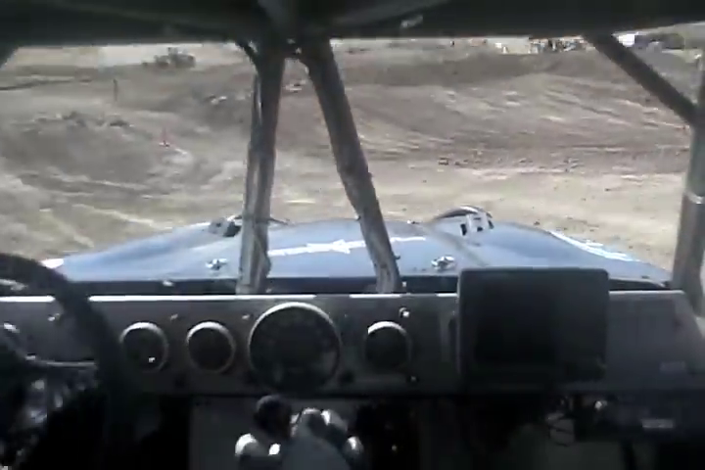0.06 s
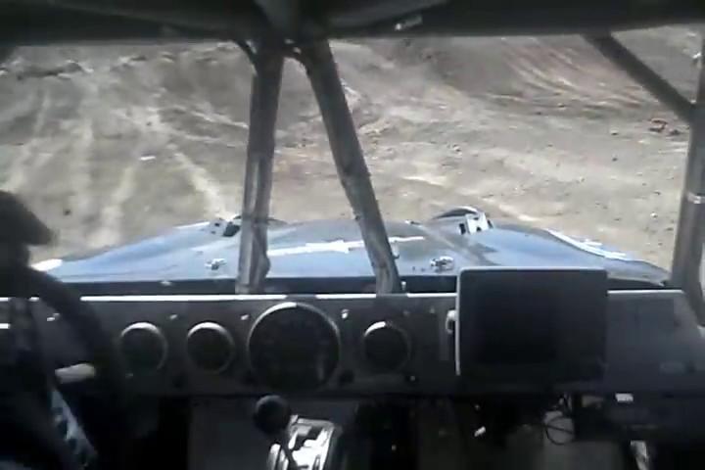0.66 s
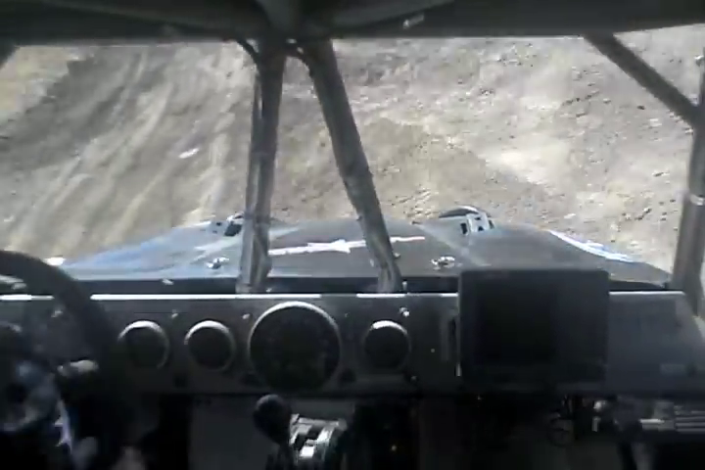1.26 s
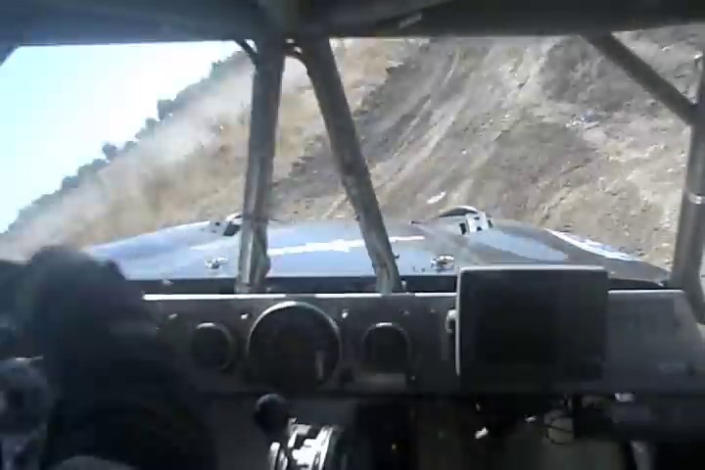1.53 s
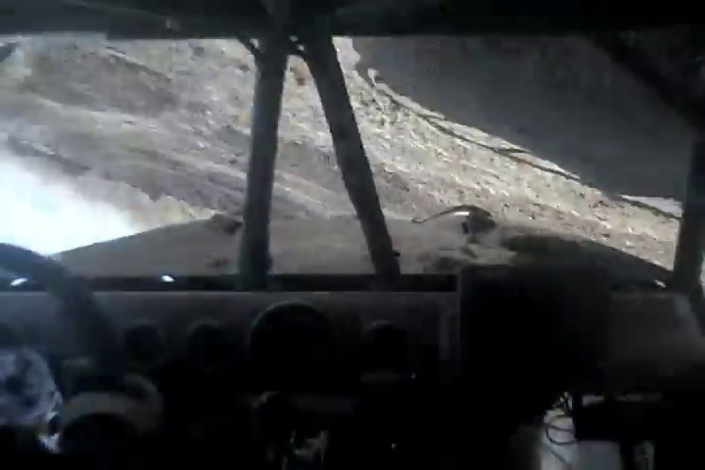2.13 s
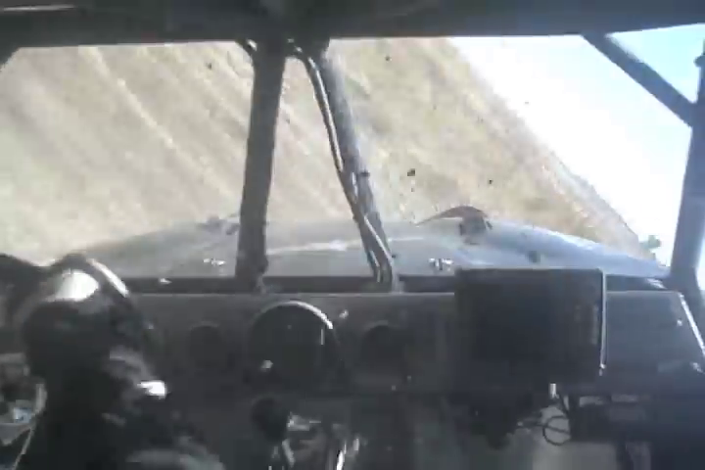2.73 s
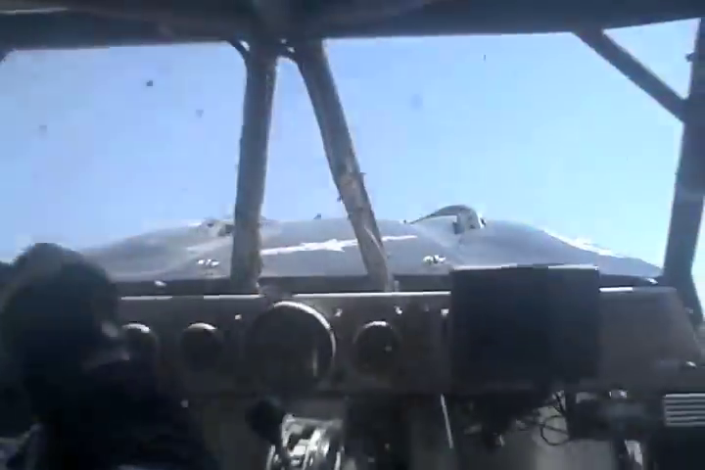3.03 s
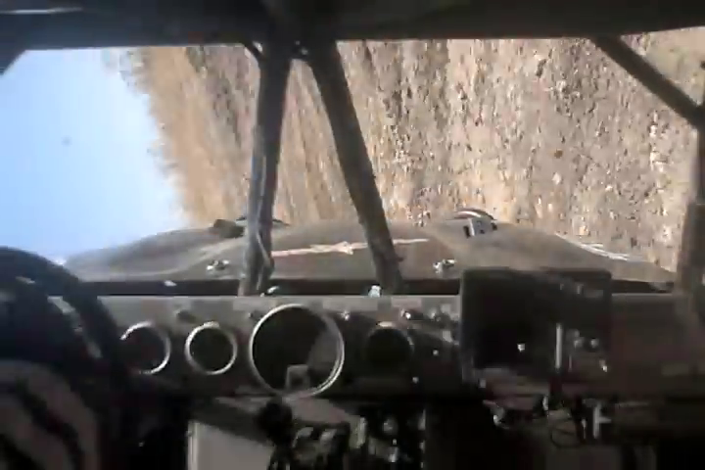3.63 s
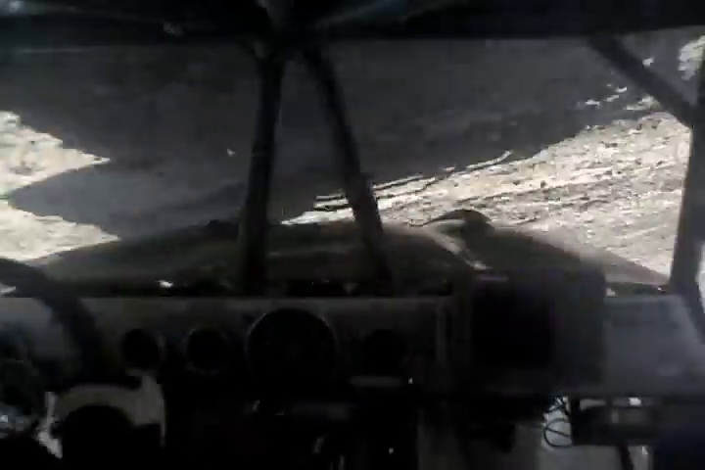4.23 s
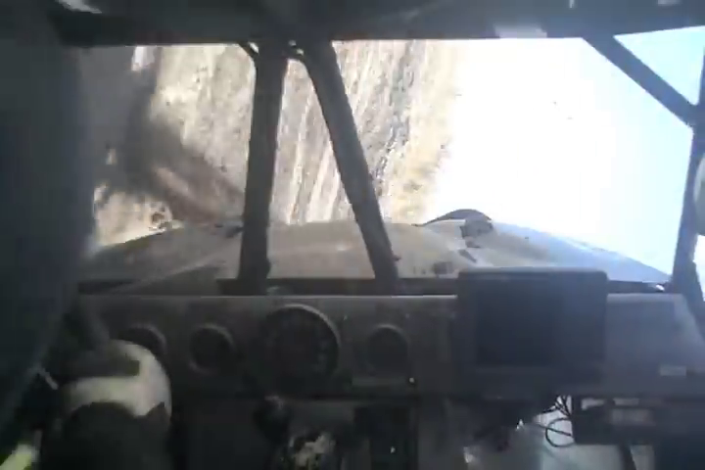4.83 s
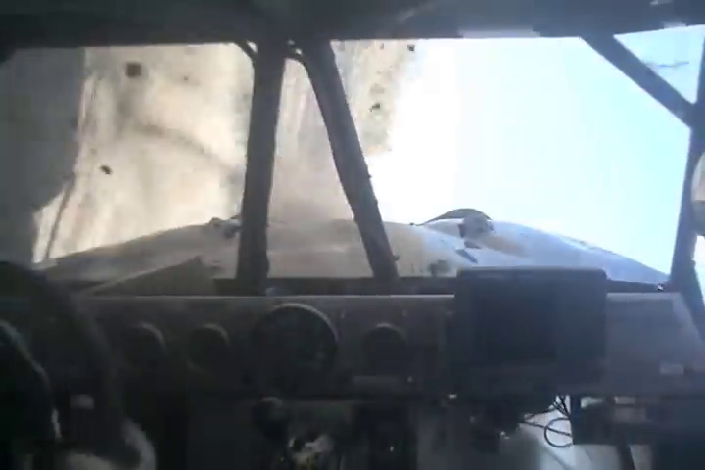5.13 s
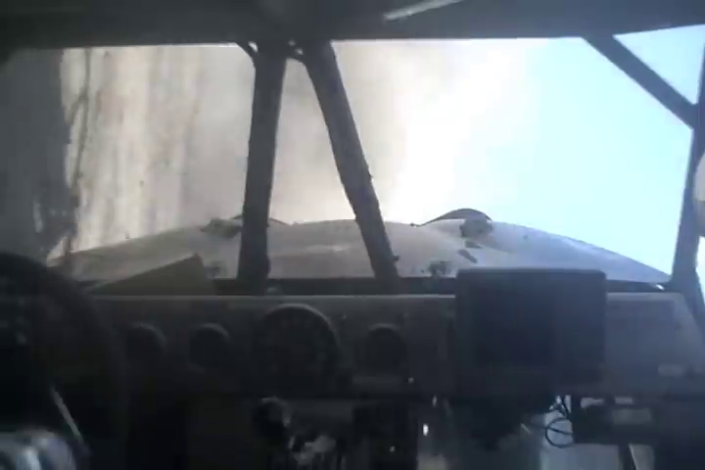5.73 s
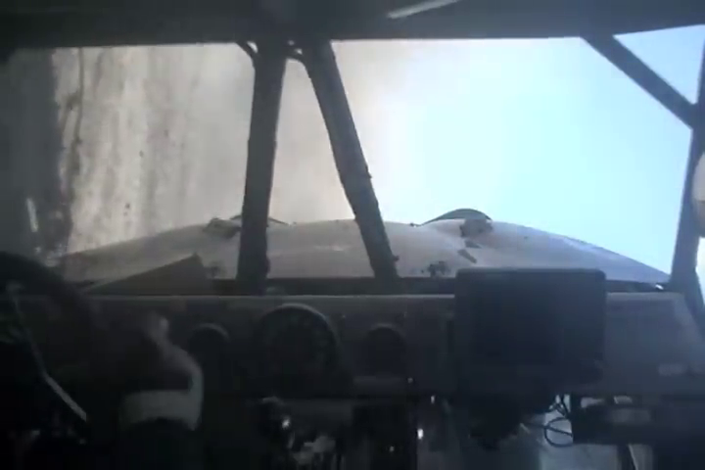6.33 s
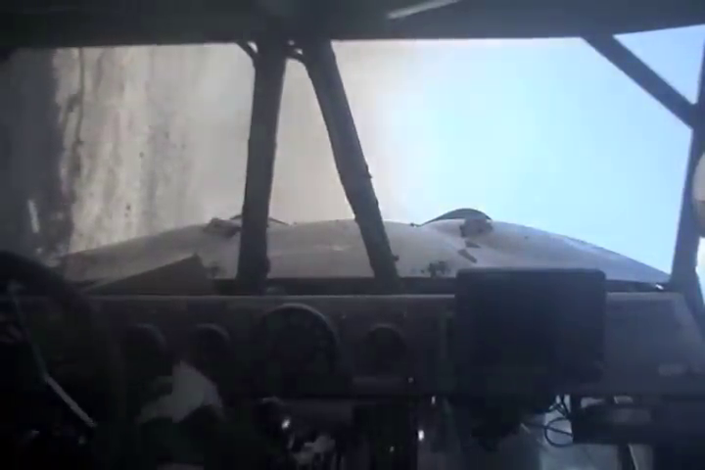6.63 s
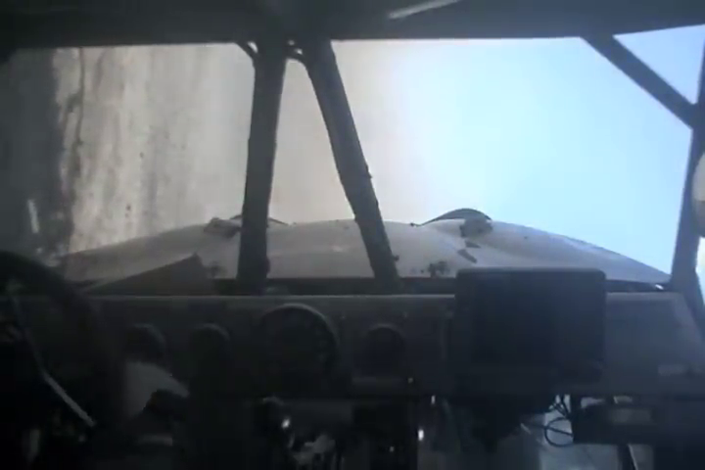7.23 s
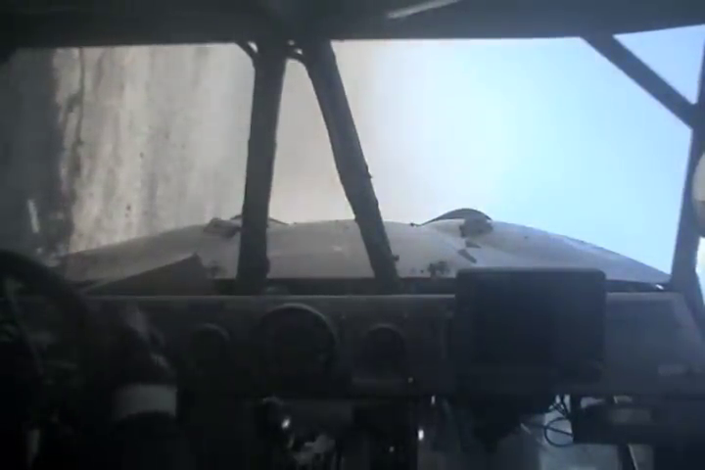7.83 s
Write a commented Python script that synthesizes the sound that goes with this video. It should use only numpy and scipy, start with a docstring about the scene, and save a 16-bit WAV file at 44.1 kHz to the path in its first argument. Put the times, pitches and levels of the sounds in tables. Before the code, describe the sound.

Inside the open cab of an off-road buggy, a V8 engine booms and barks while dirt hisses under the tyres and the frame squeaks. The revs drop, then surge and fall as the vehicle rolls over. Metal panels slam down, loose parts clack, the cage scrapes briefly on rock and stones pelt the body, the loudest moments overloading the microphone. After a last slam the buggy slides to rest and the engine idles.

```python
"""Inside the open cab of a V8 off-road buggy that rolls over on a dirt track.
First the engine booms and barks, soil hisses under the tyres and the joints squeak. Near 2 s the revs drop,
then rise and fall as the wheels leave the ground. Stones pelt the body, loose parts clack, panels slam down
and the cage scrapes on rock; the loudest moments overload the microphone. After a last slam near 5 s
the buggy slides to rest on its side, idling."""
import sys
import numpy as np
from scipy import signal
from scipy.fft import rfft, irfft, next_fast_len
from scipy.io import wavfile
from scipy.ndimage import uniform_filter1d, map_coordinates

SR = 44100
rng = np.random.default_rng(int(sys.argv[2]) if len(sys.argv) > 2 else 0)


def inscribe(sig):
    """Save sig as 16-bit PCM at rate SR to the path in sys.argv[1].

    A 1-D sig is mono; a 2-D sig holds one channel per row.
    Samples are clipped to [-1, 1] before scaling.
    """
    pcm = np.round(np.clip(np.atleast_2d(sig).T, -1, 1) * 32767)
    wavfile.write(sys.argv[1], SR, pcm.astype(np.int16))


N = 347067


def amp(db):
    """Turn decibels into a gain."""
    return 10 ** (np.asarray(db) / 20)


def unit(x):
    """Scale to an average (rms) level of 1."""
    return x / np.sqrt(np.mean(x ** 2) + 1e-20)


def steady(x):
    """Hold the level near 1, averaged over 1/8 s."""
    return x / np.sqrt(np.abs(uniform_filter1d(x ** 2, size=SR // 8)) + 1e-12)


def curve(points):
    """Join (time, value) points into one value per sample."""
    return np.interp(np.arange(N) / SR, *np.transpose(points))


def wobble(rate):
    """A smooth curve through `rate` random values a second."""
    fine = np.arange(0, N * rate / SR + 1, 1 / 8)
    smooth = map_coordinates(rng.standard_normal(int(fine[-1]) + 4), [fine])
    return np.interp(np.arange(N) * rate / SR, fine, smooth)


def filtered(x, response):
    """Scale each frequency in x by response(hz)."""
    m = next_fast_len(len(x) + SR // 4)
    return irfft(rfft(x, m) * response(np.fft.rfftfreq(m, 1 / SR)), m)[:len(x)]


def coloured(x, tone):
    """Shape x with a tone table of (frequency, level) points."""
    f, db = np.transpose(tone)
    return filtered(x, lambda hz: amp(np.interp(np.log(hz + 1), np.log(f), db)))


def noise(tone, size=N):
    """Noise with the given tone, at level 1."""
    return unit(coloured(rng.standard_normal(size), tone))


def noise_band(centre_hz, width_hz, size=N):
    """Noise around one pitch, at level 1."""
    return unit(filtered(rng.standard_normal(size), lambda hz: np.exp(-((hz - centre_hz) / width_hz) ** 2)))


def puffs(pulses, life_s):
    """Turn each pulse into a dying puff of noise."""
    return signal.lfilter([1], [1, -np.exp(-1 / (life_s * SR))], pulses) * rng.standard_normal(N)


def add(track, s, x):
    """Mix x into the track at s seconds."""
    start = max(round(s * SR), 0)
    track[start:start + len(x)] += x[:N - start]


# The engine's notes, as multiples of its speed: (harmonic [number])
HARMONICS = [1, 2, 4, 6, 7, 8, 9, 10, 11, 12, 13, 14, 15, 16, 17, 18, 19, 20, 21, 22, 23]
# Strength of each of those notes: (revving [dB], idling [dB])
HARMONIC_LEVELS = [(-17, -26.5), (-4, -40.5), (-8, -20), (-14, -15.5), (0.0, -15), (2.5, 5), (-6.5, -32),
                   (-7.5, -30), (-4, -15.5), (-5, -34.5), (-9.5, -6.5), (-7, -37), (-16, -9.5), (-12.5, -5),
                   (-28, -39.5), (-27.5, -28.5), (-7.5, -10), (-6.5, -9), (-17.5, -10), (-14, -20.5),
                   (-15.5, -21)]
# Drones of the uneven cylinder banks: (harmonic [number], level at cruise on half throttle [dB],
# change per doubling of speed [dB], change from shut to open throttle [dB])
DRONES = [(3, -8, 15, -12), (4, -13, 12, -12), (5, .5, 10, 7), (11, -13, -2, 9), (16, -19, 0, 10)]
# Tones of the tailpipe and of the manifold, where the pipes join: (frequency [Hz], level [dB])
BOOM_TONE = [(15, -29), (45, 0.5), (110, 5), (170, 4.5), (205, -4.5), (270, -21), (400, -47.5), (800, -120)]
GROWL_TONE = [(120, -49.5), (190, -14.5), (250, -1), (330, -7.5), (460, -10), (900, -7.5), (1500, -46.5)]
CRUISE_HZ = 22.7  # engine cycles a second


def boom_and_growl(cycle, speed, throttle, load):
    """Two rows of cylinders fire unevenly; their notes boom in the tailpipe and growl in the manifold."""
    phases = rng.random(max(HARMONICS) + 1)

    def note(k, db):
        """Fuel burns unevenly, so each note wanders in strength."""
        return np.sqrt(2) * amp(db + 2.08 * wobble(25)) * np.cos(2 * np.pi * (k * cycle + phases[k]))

    drone = sum(note(round(k), db + rise_db * np.log2(speed / CRUISE_HZ) + open_db * (throttle - .5))
                for k, db, rise_db, open_db in DRONES)
    notes = unit(sum(note(k, load * revving + (1 - load) * idling)
                     for k, (revving, idling) in zip(HARMONICS, HARMONIC_LEVELS)))
    burble = amp(-12.5 + 4.6 * load) * noise([(20, -17), (60, -17), (200, -2), (400, -5.5), (1500, -57.5)])
    boom = steady(coloured(notes + burble, BOOM_TONE))
    growl = steady(coloured(notes + .5 * burble, GROWL_TONE))
    return steady(boom + drone), growl


# Sharp edge of each of the eight firings; one header (exhaust pipe) is closest: (strength [gain])
FIRING_SIZES = [2.44, 0.53, 1.1, 1.4, 1, 4.4, 0.25, 0.45]


def firings(cycle):
    """Eight pulses a cycle, each a little different in size and timing."""
    count = np.arange(int(cycle[-1] * 8))
    timing, scatter = rng.standard_normal((2048, 2))[:len(count)].T
    at = np.interp(count / 8, cycle, np.arange(N)) + .00006 * SR * timing
    size = np.take(FIRING_SIZES, count % 8) * amp(-.2 * scatter)
    return np.bincount(np.clip(at, 0, N - 1).astype(int), size, N)


# Tones of the firings, the rushing gas and the ringing header: (frequency [Hz], level [dB])
BARK_TONE = [(150, -39), (280, -10), (380, 8), (480, -10), (680, 4), (820, 1.5), (1250, 0), (2000, -12.5),
             (3000, -14.5), (4500, -41), (8000, -13), (9000, -29)]
RASP_TONE = [(500, -23), (850, 0.5), (1350, 0.5), (2200, -12.5), (3200, -14.5), (5000, -20.5)]
HOWL_TONE = [(330, -51), (480, -11.5), (545, 16), (610, 16.5), (680, -17.5), (900, -41.5)]


def bark_rasp_and_howl(cycle, load):
    """Firings bark in the headers and make them howl; gas rasps past the throttle."""
    pulses = firings(cycle)
    # each firing is a clean pulse low down and rough noise higher up
    edges = steady(pulses - uniform_filter1d(pulses, size=SR // 100))
    clean = load * filtered(edges, lambda hz: 1 / (1 + 1j * hz / 1200))
    gusts = load * steady(puffs(pulses, life_s=.007))
    wash = (1 - .26 * load) * rng.standard_normal(N)
    rough = filtered(gusts + wash, lambda hz: 1j * hz / (900 + 1j * hz))
    throb = load * np.cos(2 * np.pi * (cycle - 1 / 8))  # one swell a cycle
    bark = steady(coloured(amp(3 * throb) * (clean + .8 * rough), BARK_TONE))
    rasp = steady(coloured(amp(3 * throb) * rough, RASP_TONE))
    howl = steady(coloured(amp(10 * throb) * (clean + .55 * rough), HOWL_TONE))
    return bark, rasp, howl


# Panels shaken once a cycle: (pitch [Hz], width [Hz], base level [dB])
RATTLES = [(776, 17, -60), (1020, 39, -59.5), (1590, 50, -60.5)]
# Tone of the fan, belts and valves: (frequency [Hz], level [dB])
WHIRR_TONE = [(180, -33.5), (300, -3), (463, 1), (518, 2.5), (657, -5.5), (788, -3.5), (893, -7.5),
              (1030, -11.5), (1130, -14.5), (1960, -16), (2160, -14), (3990, -27.5), (8500, -27.5),
              (11000, -73), (18700, -120)]


def fittings(cycle, boom_db, bark_db):
    """The engine shakes the frame and panels; its moving parts whirr and a belt whines."""
    shudder = amp(boom_db - 29.5) * noise([(8, -1.5), (25, 14), (40, -4.5), (80, -22), (300, -99)])
    shake = amp(5 * np.cos(2 * np.pi * cycle) + .5 * (boom_db + 18.5))
    rattle = shake * sum(amp(db) * noise_band(hz, width) for hz, width, db in RATTLES)
    whirr = noise(WHIRR_TONE) * amp(-8 + .75 * bark_db + .28 * wobble(40))
    whine = amp(-51.5 + .41 * boom_db + 2.3 * wobble(11)) * noise_band(2170, width_hz=78)
    return shudder + rattle + whirr + whine


# How fast the engine runs; a cycle is two turns: (time [s], speed [cycles/s])
ENGINE_SPEED = [(0, 25.9), (.18, 27), (.55, 24.05), (.9, 24.8), (1.18, 21.8), (1.47, 26.5), (1.62, 23.2),
                (1.95, 10.5), (2.1, 8.8), (2.28, 12.3), (2.41, 27), (2.51, 30.2), (2.69, 28.6),
                (2.83, 21.4), (3.28, 16.6), (3.4, 11.8), (3.5, 16.2), (3.72, 19.6), (4, 21.95), (4.3, 30),
                (4.58, 40.8), (4.63, 33.4), (4.7, 31), (4.88, 16.5), (5.1, 12.4), (5.27, 19), (5.42, 21.8),
                (5.62, 23.05), (5.75, 22.6), (6.07, 10.7), (6.35, 7.3), (6.8, 8.4), (7.87, 8.05)]
# How far the throttle is open: (time [s], opening [0-1])
THROTTLE = [(0, 0.83), (.3, .98), (.46, 0.65), (.65, 0.71), (.88, 0.86), (1.33, 0.93), (1.52, 0.78),
            (1.62, 0.55), (2.7, 0.49), (2.85, 0.11), (3.2, 0.5), (3.6, 0.66), (4.1, 0.74), (4.4, 0.91),
            (4.58, 0.95), (4.6, 0.45), (4.92, 0.26), (5.4, .66), (5.75, 0.65), (5.87, 0), (7.87, 0.1)]
# How loud the engine's boom is heard, including the recorder's gain dipping and recovering:
# (time [s], level [dB])
HEARD_LEVEL = [(0.0, -11), (0.22, -12.5), (1.69, -13.5), (2.02, -23), (2.22, -15.5), (2.69, -13),
               (3.24, -22.5), (3.28, -27), (3.48, -20), (4.5, -12.5), (4.74, -16), (4.95, -25.5),
               (5.15, -16), (5.69, -14.5), (6.15, -22.5), (6.97, -22), (7.21, -12), (7.8, -12.5)]
HOWL_FROM_HZ, HOWL_SPAN_HZ = 25.23, 1.1  # the howl swells over this range of engine speed


def engine():
    """The V8: speed and throttle set the balance of its layers."""
    speed, throttle, boom_db = curve(ENGINE_SPEED), curve(THROTTLE), curve(HEARD_LEVEL)
    cycle = np.cumsum(speed * (1 + .003 * wobble(25))) / SR  # cycles run so far
    load = np.clip((speed - 9) / 7, 0, 1)  # 0 idling, 1 revving
    bark_db = boom_db - 26.5 + 24 * throttle
    rasp_db = bark_db - 13 - 23 * (1 - throttle)
    howling = throttle * np.clip((speed - HOWL_FROM_HZ) / HOWL_SPAN_HZ, 0, 1)
    howl_db = bark_db - 14 + howling * (11.5 + 9 * np.log2(speed / CRUISE_HZ))
    boom, growl = boom_and_growl(cycle, speed, throttle, load)
    bark, rasp, howl = bark_rasp_and_howl(cycle, load)
    exhaust = (amp(boom_db - .06) * boom + amp(bark_db - 3) * growl + amp(bark_db - 5.5) * bark
               + amp(rasp_db) * rasp + amp(howl_db) * howl)
    return exhaust + fittings(cycle, boom_db, bark_db)


# The tyres or body slide over soil: (start [s], length [s], level [dB])
SLIDES = [(0, .35, -34), (.35, 0.64, -35.5), (0.78, 0.734, -32.5), (1.546, 0.46, -34), (2.231, 0.46, -30),
          (3.09, 0.3, -33.5), (3.667, 0.32, -32.5), (4.33, 0.33, -35), (5, 1, -45)]
SLIDE_RISE_S, SLIDE_FALL_DB_PER_S = .027, 111
TRICKLE_DB, TRICKLE_FALL_DB_PER_S = -8, 13.5


def sliding():
    """Strength of the dirt sound: each slide rises, holds and falls, then thrown soil trickles down."""
    out, t = np.zeros(N), np.arange(N) / SR
    for s, length, db in SLIDES:
        rise = np.clip((t - s) / SLIDE_RISE_S, 0, 1)
        after = np.maximum(t - s - length, 0)
        fall_db = np.maximum(-SLIDE_FALL_DB_PER_S * after, TRICKLE_DB - TRICKLE_FALL_DB_PER_S * after)
        out = np.maximum(out, rise * amp(db + fall_db))
    return out


# Tones of the hissing soil and the jolting frame: (frequency [Hz], level [dB])
SOIL_TONE = [(530, -15), (900, 4), (1200, 5), (1550, 3), (1800, 3), (2970, -1.5), (3580, -3), (8500, -3.5),
             (11000, -59), (18700, -120)]
RUMBLE_TONE = [(10, -3.5), (28, -5.5), (55, 5.5), (90, -3.5), (200, -40.5)]


def dirt():
    """Clumps of soil and grains of grit hiss along the body; the frame rumbles over the ground."""
    grains = (rng.random(N) < 900 / SR) * rng.standard_normal(N)  # about 900 a second
    grains *= amp(.7 * np.minimum(rng.exponential(size=N), 4))
    grit = unit(coloured(puffs(np.abs(grains), life_s=.0026), SOIL_TONE))
    clumps = amp(4 * wobble(35))
    hiss = clumps * (amp(-.44) * noise(SOIL_TONE) + amp(-1) * grit)
    return sliding() * (hiss + amp(3) * noise(RUMBLE_TONE))


# Squeaks of the frame: (time [s], length [s], pitch [Hz], level [dB])
SQUEAKS = [(1.04, 0.098, 1880, -28.5), (1.1, 0.063, 4574, -30.5), (1.387, 0.069, 4200, -31.5),
           (1.73, 0.12, 3020, -33.5), (1.85, 0.11, 2290, -33), (2.45, 0.13, 3060, -31.5),
           (5.016, .06, 2960, -28)]


def squeaks():
    """Strained joints squeak, each around one pitch."""
    out = np.zeros(N)
    for s, length, hz, db in SQUEAKS:
        squeak = noise_band(hz, width_hz=76, size=int(length * SR))
        add(out, s, amp(db) * squeak * np.hanning(len(squeak)))
    return out


# Stones strike the cab: (time [s], level [dB], time to fade by 60 dB [s])
STONE_HITS = [(1.734, -27, 0.64), (2.1623, -33.5, 0.089), (3.0645, -28.5, 0.1), (3.5284, -24.5, 0.096),
              (3.9562, -15.5, 0.074), (4.1118, -16, 0.044), (4.1948, -14, 0.039), (4.2541, -11, 0.043),
              (4.2701, -13, 0.1), (4.348, -13.5, 0.049), (4.7078, -23, 0.23), (4.782, -27, 0.092),
              (5.1652, -22.5, 0.097), (5.334, -24.5, 0.2), (5.686, -22.5, 0.032), (6.23, -44, .18),
              (6.4, -40.5, 0.11)]


def stones():
    """A hard crack, then a short spatter as the clod breaks."""
    out, t = np.zeros(N), np.arange(SR // 4) / SR
    tone = [(200, -20.5), (900, 3), (3000, 2.5), (5500, 1), (8500, 5.5), (11000, -62.5)]
    crack = amp(-60 * t / .0017)
    for s, db, fade_s in STONE_HITS:
        spatter = amp(-3.5 - 60 * t / fade_s)
        add(out, s, amp(db) * (crack + spatter) * noise(tone, size=len(t)))
    return out


# Loose metal hits the cage: (time [s], pitch [Hz], relative level [dB], time to fade by 60 dB [s])
CLACKS = [(1.842, 2470, -4, 0.0074), (2.422, 3960, -6.5, 0.032), (2.55, 1500, -8.5, 0.14),
          (2.584, 3280, -6, 0.028), (3.241, 3220, 0.5, 0.13), (3.256, 1530, -6, 0.19),
          (4.041, 1035, -7, 0.16), (5.058, 3380, -14.5, 0.091), (6.15, 3220, -47, 0.14),
          (6.405, 1620, -33, 0.13), (6.617, 3210, -42, 0.036)]


def clacks():
    """Each knocked part gives a quickly dying burst around its own pitch."""
    out, t = np.zeros(N), np.arange(SR // 4) / SR
    for s, hz, db, fade_s in CLACKS:
        add(out, s, amp(db - 5.5 - 60 * t / fade_s) * noise_band(hz, .5 * hz, size=len(t)))
    return out


# Notes of the sheet metal: (pitch [Hz], level [dB], time to fade by 60 dB [s])
PANEL_NOTES = [(810, -20, 0.052), (1065, -21, 0.35), (1305, -5, 0.54), (1500, 7.5, 0.12),
               (2100, 1.5, 0.038), (2320, -8, 0.3), (2430, -7, 0.25), (3031, -17.5, 0.045), (3650, 2, 0.4),
               (5030, 0, 0.083), (5700, -22, 0.21), (6000, -30.5, 0.22)]


def panel_ring(t):
    """The panels ring with new strengths at every blow."""
    extra_db = rng.normal(0, 3, len(PANEL_NOTES))
    return unit(sum(amp(db + extra - 60 * t / fade_s) * np.sin(2 * np.pi * (hz * t + rng.random()))
                    for (hz, db, fade_s), extra in zip(PANEL_NOTES, extra_db)))


# The body lands: (time [s], relative level [dB], extra thud [dB], time to fade by 60 dB [s])
LANDINGS = [(2.3304, -4.5, 0, 0.16), (2.3708, -17, 9.5, 0.43), (2.5509, -10.5, -6.5, 0.18),
            (2.5832, -14, -6.5, 0.16), (3.1498, -16.5, -13.5, 0.19), (3.1731, -12, -9, 0.18),
            (3.242, 1.5, -11, 0.1), (4.0397, -4.5, -8.5, 0.051), (4.9975, -22, -11, 0.89),
            (5.0565, -19, 0.5, 0.36)]
# Tones of the crushed soil and the thudding frame: (frequency [Hz], level [dB])
CRUNCH_TONE = [(410, -35), (700, 3), (1530, 4.5), (1990, 7), (2330, 5.5), (3020, 3), (4010, 0), (8150, 4.5),
               (8500, -2), (11000, -36.5), (18700, -120)]
THUD_TONE = [(60, -54.5), (150, -4.5), (330, -15), (600, -16), (1000, -20.5), (2500, -38)]


def slams():
    """Each landing crushes soil, rings the panels and thuds through the frame."""
    out, t = np.zeros(N), np.arange(SR // 3) / SR
    rise = 1 - np.exp(-t / .0011)
    for s, db, thud_db, fade_s in LANDINGS:
        crunch = noise(CRUNCH_TONE, size=len(t))
        ring = amp(-21) * panel_ring(t)
        thud = amp(thud_db + 4) * noise(THUD_TONE, size=len(t))
        add(out, s, rise * amp(db - 4 - 60 * t / fade_s) * (crunch + ring + thud))
    return out * amp(1.2 * wobble(300))


# A cage tube scrapes over rock: (time [s], length [s], level [dB])
SCRAPES = [(3.865, 0.035, -10), (3.891, 0.037, -14)]
# Where the tube rings: (pitch [Hz], width [Hz], level [dB])
TUBE_NOTES = [(1400, 130, 3), (2040, 20, 7), (2486, 160, -4), (4130, 35, -19.5), (6360, 130, -13),
              (6800, 47, -25.5), (8090, 130, -6.5)]


def scrapes():
    """The tube sticks and slips on the rock, which sets it ringing."""
    out = np.zeros(N)
    tube = lambda hz: sum(amp(db) * 1j * hz * width / (pitch ** 2 - hz ** 2 + 1j * hz * width)
                          for pitch, width, db in TUBE_NOTES)
    for s, length, db in SCRAPES:
        grip = np.repeat(rng.standard_normal(42), SR // 330)  # changes about 330 times a second
        slips = rng.standard_normal(len(grip)) * amp(2 * grip)
        scrape = (unit(filtered(slips, tube)) + amp(-6) * slips)[:int(length * SR)]
        add(out, s, amp(db) * scrape * np.sqrt(np.hanning(len(scrape))))
    return out


def scene():
    """Everything heard in the cab, on one channel."""
    return (engine() + dirt() + squeaks() + stones() + clacks() + slams() + scrapes())[None]


def overload(x, top, hardness):
    """Round off the peaks so they stay below top."""
    return x / (1 + np.abs(x / top) ** hardness) ** (1 / hardness)


def record(dry):
    """The microphone overloads and the high treble is cut; peaks that overshoot are clipped once more."""
    dulled = filtered(overload(dry[0], top=.52, hardness=7.7), lambda hz: hz < 8650)
    return filtered(overload(dulled, top=.49, hardness=22), lambda hz: hz < 14800)[None]


dry = scene()
out = record(dry)
inscribe(out)
```